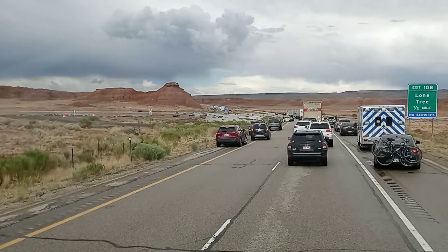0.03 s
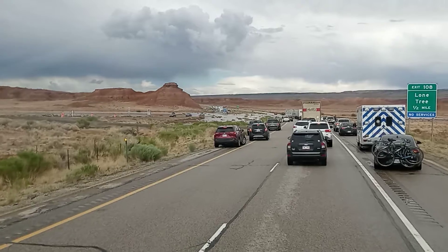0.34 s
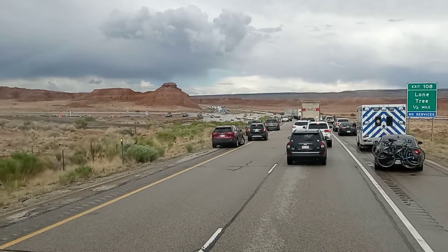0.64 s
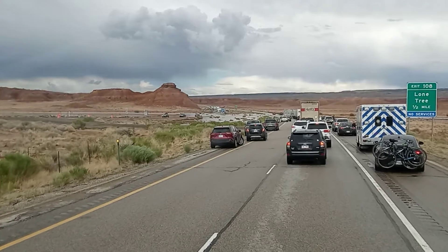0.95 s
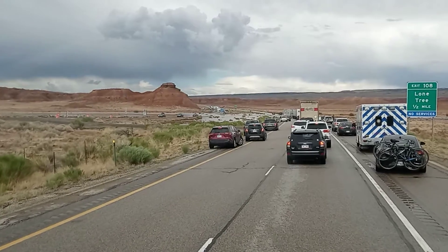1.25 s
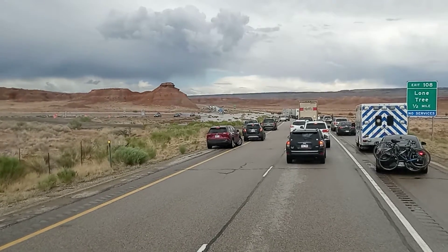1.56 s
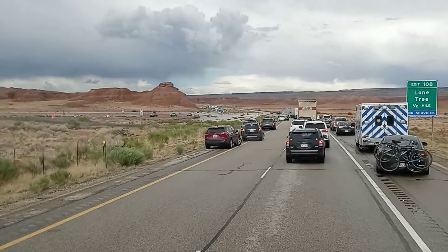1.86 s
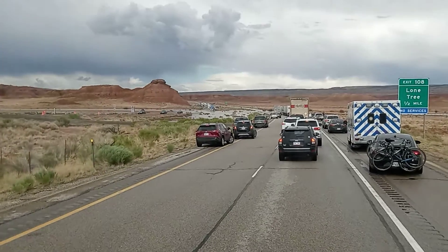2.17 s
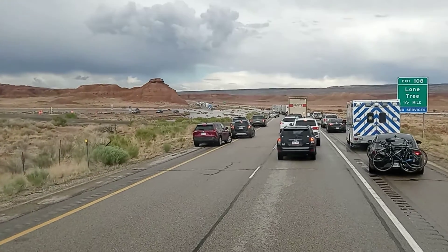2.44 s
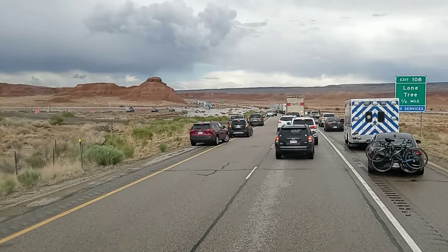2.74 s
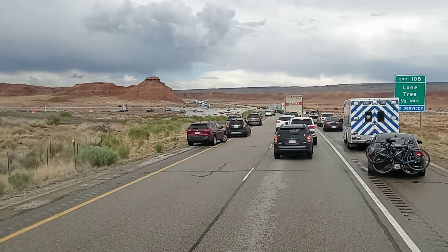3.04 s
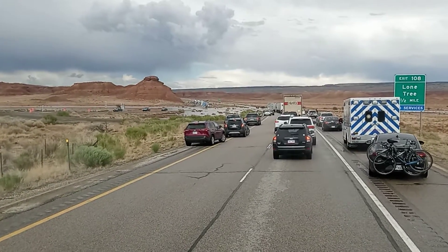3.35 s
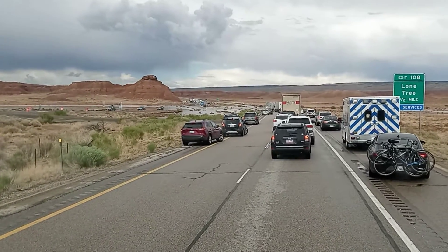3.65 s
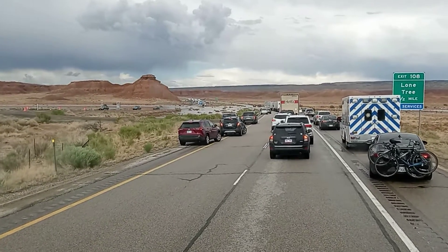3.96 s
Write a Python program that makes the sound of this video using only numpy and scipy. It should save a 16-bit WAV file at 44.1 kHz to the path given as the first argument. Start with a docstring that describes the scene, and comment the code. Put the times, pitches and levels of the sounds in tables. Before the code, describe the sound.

A low engine drone and road rumble fill the cabin of a vehicle creeping along a highway. The hum rises slightly in pitch, ventilation rushes softly behind it, and the tyres thump dully over a few cracks.

```python
"""Inside a vehicle that gathers a little speed in slow highway traffic.
The engine's orders glide through the cabin's resonances and beat against a shaft that turns slightly
faster. Under them lie road rumble, a low body boom, a soft tyre ring and a few thumps from cracks in
the road, with the rush and hiss of the ventilation behind. The sound fades in."""
import sys
import numpy as np
from scipy import signal
from scipy.fft import rfft, irfft
from scipy.io import wavfile
from scipy.ndimage import uniform_filter1d

SR = 44100
rng = np.random.default_rng(int(sys.argv[2]) if len(sys.argv) > 2 else 0)


def generate_wav(signal):
    """Clip the signal to [-1, 1] and save it as 16-bit WAV at the path in sys.argv[1]."""
    frames = np.transpose(np.atleast_2d(signal))
    scaled = np.clip(frames, -1, 1) * 32767
    pcm = np.round(scaled).astype(np.int16)
    wavfile.write(sys.argv[1], SR, pcm)


N = 176400
TIME = np.arange(N) / SR

# colour of the rushing air (frequency [Hz], relative level [dB])
RUSH_COLOUR = [(200, -10), (700, 2.5), (1350, 2), (1650, -0.5), (1850, -1), (2400, -1.5), (3400, -2),
               (4100, -5.5), (4800, -11.5), (5600, -14.5), (7000, -14), (9000, -16), (16000, -35)]
# level ride of the rush (time [s], level [dB])
RUSH_LEVEL = [(0.4, -41.5), (1.5, -40.5), (4.0, -40)]
# narrow resonances of the air ducts (frequency [Hz], width [Hz], lift [dB])
DUCT_MODES = [(1555, 25, 3), (1856, 20, 4.5), (2140, 30, 2), (2830, 16, 2), (3410, 130, 1.5)]
# colour of the vent hiss (frequency [Hz], relative level [dB])
HISS_COLOUR = [(4000, -35), (7550, -11.5), (8050, 1.5), (8550, -2), (9300, -1), (10200, -6), (12000, -5.5),
               (13400, -9.5), (14500, -10.5), (15800, -16)]
# level ride of the hiss (time [s], level [dB])
HISS_LEVEL = [(0.4, -48), (1.0, -48), (2.0, -45), (2.4, -45.5), (3.5, -45), (4.0, -45.5)]
# drifting notch in the hiss (time [s], centre [Hz])
HISS_NOTCH = [(0.4, 11800), (1.5, 11700), (2.05, 12500), (2.4, 11200), (2.8, 11500), (3.5, 11900),
              (4.0, 11400)]
# level ride of the tyre ring (time [s], level [dB])
TYRE_LEVEL = [(0.4, -49), (1.4, -42.5), (2.1, -48.5), (2.6, -50), (4.0, -51.5)]
# level ride of the body's low boom (time [s], level [dB])
BOOM_LEVEL = [(0.4, -47), (0.8, -36), (1.12, -42), (1.35, -29.5), (1.8, -33), (2.05, -38), (2.25, -31),
              (2.5, -44), (2.8, -34), (3.3, -39), (3.7, -33), (4.0, -42)]
# colour of the road rumble (frequency [Hz], relative level [dB])
RUMBLE_COLOUR = [(10, -27), (30, -34), (50, -14), (64, -13.5), (85, -7), (105, -3.5), (140, 2), (175, -3),
                 (210, -12), (245, -15), (340, -16), (430, -17), (520, -15), (565, -17.5), (640, -14.5),
                 (900, -18.5), (1080, -18.5), (1200, -26.5), (1700, -41.5), (4000, -79)]
# level ride of the rumble (time [s], level [dB])
RUMBLE_LEVEL = [(0.28, -30), (0.4, -28), (0.8, -28.5), (1.05, -29), (1.35, -28), (2.0, -27.5), (3.0, -27),
                (4.0, -27)]
# thumps as the tyres cross cracks (time [s], peak [dB])
CRACKS = [(0.675, -17.5), (0.771, -18.5), (0.82, -16), (1.15, -21.5), (3.208, -17.5)]
# resonances of the cabin (frequency [Hz], width [Hz], lift [dB])
CABIN_MODES = [(82.2, 8, 9.5), (143, 9.3, 1.5), (202.6, 7.1, 13), (224.4, 5.4, 11), (260, 7.8, 16),
               (312.6, 12, 14), (377.7, 6.8, 10), (486, 12, 15)]
# engine speed (time [s], four-stroke cycle rate [Hz])
CYCLE_RATE = [(0.1, 19.83), (0.65, 20.11), (1.05, 20.63), (1.5, 20.96), (2.0, 21.21), (2.4, 21.63),
              (2.7, 22.06), (2.95, 22.21), (3.5, 21.98), (4.0, 22.21)]
# shaft orders (multiple of the shaft's rate, level at top speed before the cabin [dB])
SHAFT_ORDERS = {2: -41, 4: -42.5, 6: -37, 7: -37, 8: -51.5, 10: -62.5, 20: -54.5}
# engine orders (multiple of the cycle rate, level at top speed before the cabin [dB])
ENGINE_ORDERS = {2: -47, 4: -47, 5: -44, 6: -44, 7: -35.5, 8: -40, 9: -47.5, 10: -46.5, 11: -49.5, 12: -52,
                 13: -54.5, 14: -56.5, 15: -54, 17: -52.5, 18: -61, 22: -59.5}


def amp(db):
    """Decibels to gain."""
    return 10 ** (np.asarray(db) / 20)


def unit(x):
    """Scales to rms 1."""
    return x / np.sqrt(np.mean(x ** 2) + 1e-20)


def curve(points, t=TIME):
    """Reads an automation curve in time."""
    return np.interp(t, *np.transpose(points))


def spectrum(points, hz):
    """Reads an EQ curve on a log-frequency axis."""
    f, db = np.transpose(points)
    return np.interp(np.log(hz + 1), np.log(f + 1), db)


def bell(hz, centre, width):
    """A smooth hump of height 1."""
    return np.exp(-.5 * ((hz - centre) / width) ** 2)


def lift_db(resonances, hz):
    """The boost that a set of resonances gives to each frequency."""
    return sum(db * bell(hz, centre, width) for centre, width, db in resonances)


def wander(rate_hz):
    """Random drift of rms 1, rolling off above the given rate."""
    hz = np.fft.rfftfreq(N, 1 / SR)
    return unit(irfft(rfft(rng.standard_normal(N)) * (hz > 0) / (1 + (hz / rate_hz) ** 4), N))


def ringing(centre_hz, width_hz):
    """Noise of rms 1 in one narrow resonance."""
    hz = np.fft.rfftfreq(N, 1 / SR)
    return unit(irfft(rfft(rng.standard_normal(N)) / (1 + ((hz - centre_hz) / width_hz) ** 2), N))


def noise(colour, patchy_db, size, ripple_db=.7):
    """Noise of rms 1 shaped by colour(hz, t) in dB, with small random patches and a fine ripple."""
    hop = size // 4
    t = np.arange(N // hop + 5)[:, None] * hop / SR
    hz = np.fft.rfftfreq(size, 1 / SR)
    re, im, patches = rng.standard_normal((3, len(t), len(hz)))
    patches = unit(uniform_filter1d(uniform_filter1d(patches, size=48, axis=0), size=4, axis=1))
    # close reflections leave a steady ripple above the bass
    ripple = unit(uniform_filter1d(rng.standard_normal(len(hz)), size=3)) * hz / (hz + 600)
    frames = (re + 1j * im) * amp(colour(hz, t) + patchy_db * patches + ripple_db * ripple)
    return unit(signal.istft(frames.T, nperseg=size, noverlap=size - hop)[1][:N])


def ventilation(notch_width_hz=580, notch_db=-7):
    """The air bed: a rush through resonant ducts and a fine vent hiss share a slight flutter."""
    def rush_colour(hz, t):
        return spectrum(RUSH_COLOUR, hz) + lift_db(DUCT_MODES, hz)

    def hiss_colour(hz, t):
        return spectrum(HISS_COLOUR, hz) + notch_db * bell(hz, curve(HISS_NOTCH, t), notch_width_hz)

    rush = noise(rush_colour, patchy_db=1.9, size=2048) * amp(curve(RUSH_LEVEL))
    hiss = noise(hiss_colour, patchy_db=2.0, size=1024) * amp(curve(HISS_LEVEL))
    flutter_db = 0.46 * wander(rate_hz=46)
    return (rush + hiss) * amp(flutter_db)


def tyre_ring():
    """The tyres sing softly in one narrow midrange band."""
    return ringing(centre_hz=1067.4, width_hz=18) * amp(curve(TYRE_LEVEL))


def body_boom():
    """The body booms in one low resonance that swells and ebbs."""
    return ringing(centre_hz=85.5, width_hz=8.9) * amp(curve(BOOM_LEVEL))


def road_rumble(cabin_share=0.27):
    """A dark, uneven rumble from the road, lightly coloured by the cabin."""
    def colour(hz, t):
        return spectrum(RUMBLE_COLOUR, hz) + cabin_share * lift_db(CABIN_MODES, hz)

    rumble = noise(colour, patchy_db=1.15, size=4096)
    bumps_db = 1.0 * wander(rate_hz=28)
    return rumble * amp(curve(RUMBLE_LEVEL) + bumps_db)


def thumps(pitch_hz=140.9, attack_s=0.0099):
    """Each crack gives the body a short, low shudder."""
    out = np.zeros(N)
    for start, db in CRACKS:
        age = np.maximum(TIME - start, 0)
        envelope = age / attack_s * np.exp(1 - age / attack_s)
        out += amp(db) * envelope * np.sin(2 * np.pi * (pitch_hz * age + rng.random()))
    return out


def hum(orders, rate, db_per_hz):
    """Wavering multiples of a turning rate grow with speed and swell as they cross cabin resonances."""
    turns = np.cumsum(rate) / SR
    speed_db = db_per_hz * (rate - rate.max())
    out = np.zeros(N)
    for order, db in orders.items():
        waver_db = 1.5 * wander(rate_hz=4.4)
        tone = np.sqrt(2) * np.sin(2 * np.pi * (order * turns + rng.random()))
        out += tone * amp(db + lift_db(CABIN_MODES, order * rate) + speed_db + waver_db)
    return out


def engine(shaft_ratio=1.0625):
    """The main drone: the engine and the slightly faster shaft throb against each other."""
    rate = curve(CYCLE_RATE)
    return hum(ENGINE_ORDERS, rate, db_per_hz=1) + hum(SHAFT_ORDERS, rate * shaft_ratio, db_per_hz=2)


def scene():
    """The cabin mix, in mono."""
    return (engine() + road_rumble() + body_boom() + tyre_ring() + ventilation() + thumps())[None]


def record(dry):
    """A moment of silence, a short fade-in, and a steep low-pass on the very top."""
    start_s, start_gain, ramp_s = .116, 0.071, 0.29
    fade = (TIME > start_s) * np.clip(start_gain + (TIME - start_s) / ramp_s, 0, 1)
    low_pass = signal.firwin(801, cutoff=15850, window=("kaiser", 9), fs=SR)
    return signal.oaconvolve(dry * fade, low_pass[None], "same")


dry = scene()
out = record(dry)
generate_wav(out)
```